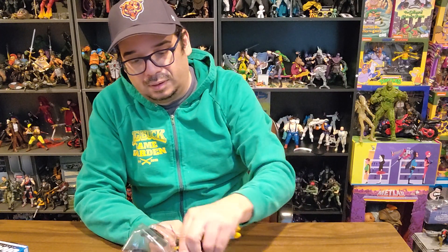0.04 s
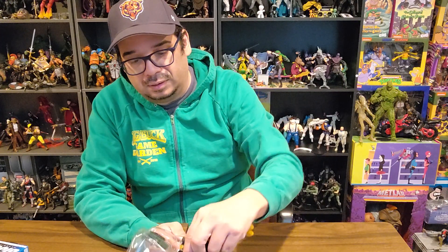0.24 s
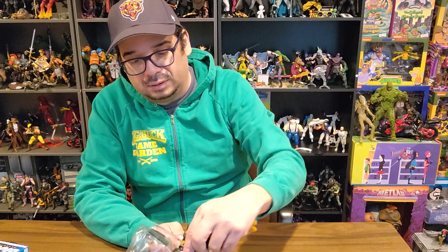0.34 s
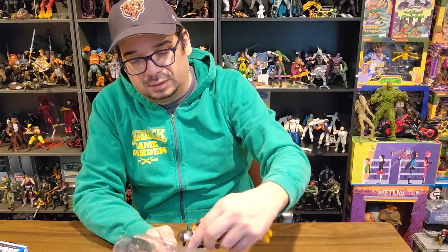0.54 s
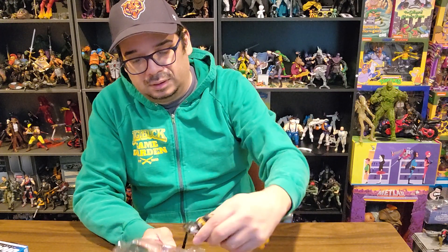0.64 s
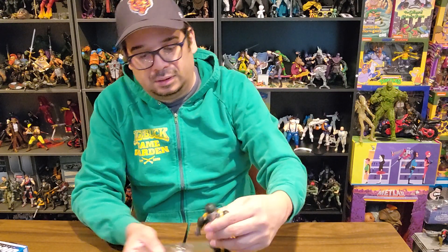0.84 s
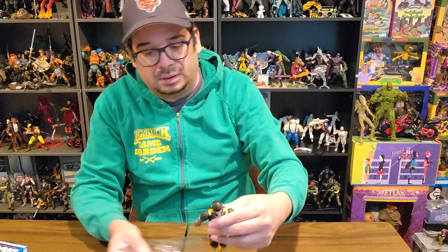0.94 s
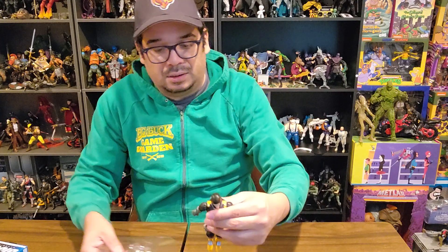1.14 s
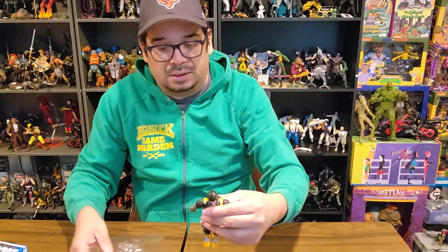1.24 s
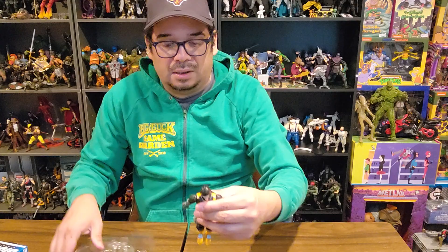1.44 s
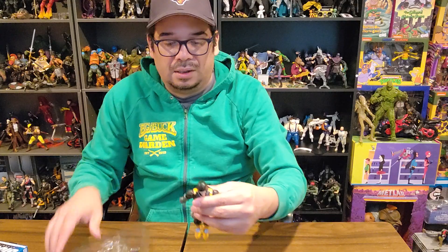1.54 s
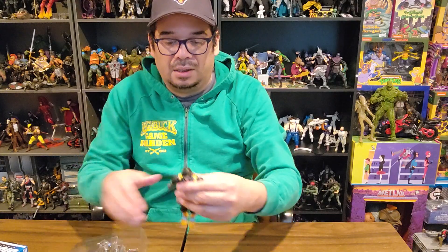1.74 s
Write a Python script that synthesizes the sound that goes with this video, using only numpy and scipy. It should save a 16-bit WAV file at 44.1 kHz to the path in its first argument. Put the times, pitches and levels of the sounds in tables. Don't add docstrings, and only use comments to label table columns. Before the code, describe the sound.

Thin hard plastic packaging crinkles, strains and pops sharply until a toy comes loose; faint settling ticks follow, then the empty tray is pushed aside, rattling on wood, heard at arm's length in a small, fairly dry room.

```python
import sys
import numpy as np
from scipy import signal
from scipy.fft import rfft, irfft
from scipy.io import wavfile
from scipy.ndimage import uniform_filter1d

SR = 44100
rng = np.random.default_rng(int(sys.argv[2]) if len(sys.argv) > 2 else 0)


def level_to_linear(level):
    exponent = np.asarray(level, float) / 20
    return 10 ** exponent


def pcm_store(signal):
    levels = np.round(np.clip(np.atleast_2d(signal), -1, 1) * 32767)
    wavfile.write(sys.argv[1], SR, levels.astype(np.int16).T)


N = 79380

# freq_hz, level_db
AIR_COLOUR = [(15, -29.5), (25, -10), (134, -10.5), (256, -39), (2160, -22), (6000, -27.5), (7000, -31.5),
              (16000, -42.5)]
# freq_hz, fade_s
ROOM_FADE = [(150, .26), (2000, .14), (12000, .11)]
# start_s, peak_db
THUMPS = [
    (0.377, -50),
    (0.533, -58),
    (0.547, -38.5),
    (0.729, -59.5),
    (1.228, -54.5),
    (1.48, -41),
    (1.52, -44.5),
    (1.606, -54),
]
TABLE_HZ = (68, 109, 208.5)

# time_s, level_db
GRIP = [
    (0, -63),
    (.13, -54),
    (.145, -47),
    (.2, -45.5),
    (.28, -47),
    (.335, -47.5),
    (.37, -110),
]
# time_s, level_db
STRAIN = [
    (.33, -55.5),
    (.385, -31.5),
    (.47, -45.5),
    (.52, -34),
    (.61, -64.5),
    (.76, -64),
]
# time_s, level_db
CRACKLE = [(0, -69), (.12, -80), (.19, -54.5), (.22, -55), (.31, -54), (.335, -80.5), (.37, -43),
           (.43, -49), (.52, -46), (.6, -63), (.65, -79), (.8, -120)]
# time_s, level_db
DRAG = [
    (1.16, -71.5),
    (1.25, -45),
    (1.42, -52),
    (1.55, -47.5),
    (1.575, -77),
    (1.60, -49.5),
    (1.72, -55.5),
    (1.75, -68.5),
    (1.8, -77),
]
# time_s, level_db
EASE = [
    (0.839, -80),
    (.90, -91),
    (1.0, -85.5),
    (1.04, -96),
]

# freq_hz, level_db
CREAK_COLOUR = [(100, -14), (400, -5), (1330, -3), (3300, -13.5), (16000, -55.5)]
FILM_COLOUR = [(1000, -33), (2800, -14), (5500, 2.5), (6500, -4), (12000, -16.5), (16000, -19)]
SCRAPE_COLOUR = [(100, -22.5), (620, -12.5), (1500, -17), (3300, -22.5), (3900, -24.5), (5600, -19),
                 (6600, -56.5), (16000, -47.5)]

# pitch_hz, width_hz, level_db
TRAY_HELD = [(388, 12, -4.5), (600.5, 40, 3.5), (995, 11, -1.5), (1332, 57, -12), (1566, 240, 0.5),
             (2093, 83, -5)]
TRAY_GRIPPED = [(405, 54, 2.5), (520, 38, 0), (1030, 59, 1.5), (1290, 20, -7.5), (1450, 30, 4.5),
                (2000, 150, -8.5)]
TRAY_FLAT = [(626.4, 15, 5.5), (722.4, 27, 2), (873, 36, -5), (1370, 160, -8), (1496, 52, -4.5),
             (1800, 50, 2), (1780, 380, -2), (2510, 40, -2.5)]
TRAY_SLIDING = [(624, 45, -0.5), (710, 40, -0.5), (1270, 60, -3), (1460, 40, 3.5), (1873, 100, -6),
                (2430, 24, -9), (5840, 300, -20)]
# pitch_hz, width_hz, level_db
FILM_RINGS = [(3406, 250, 0), (4100, 200, -2), (5360, 400, 0)]
EASE_RINGS = [(2190, 140, -0.5), (3270, 120, -9.5), (3990, 77, -7)]

# start_s, peak_db, body_db, crisp_db, edge_db
PULL = [(0.012, -37.5, -11.5, -8, -45), (0.016, -42.5, -25, -39, -43), (0.0455, -66, -19, 6.5, 4),
        (0.0583, -55, 5, 5.5, -5.5), (0.076, -44.5, 2, -5, -9), (0.0995, -60, -2, 16, -21),
        (0.137, -36.5, -11, -11, -14.5), (0.1554, -38, 0, -2.5, -23), (0.166, -56.5, -18, 2, -1),
        (0.1913, -32.5, -10, -1, -2.5), (0.2276, -11, -30, -4, -11), (0.289, -27, -23, -12, -49),
        (0.3672, -16, -11.5, -9, -24), (0.3835, -26, -3.5, -12, -5.5), (0.4029, -32.5, -5, -3, -4),
        (0.4386, -28, -33.5, 3.5, 8.5), (0.4843, -6, -14.5, -7.5, -11)]
FREE = [
    (0.5253, -6, -14.5, -11.5, 1),
    (0.5292, -12, -11.5, -2, -3.5),
    (0.5311, -7, -16.5, 1, -8.5),
    (0.537, -9.5, -22, 0, -18.5),
    (0.544, -16.5, -4.5, -1.5, -19),
]
SMALL = [
    (.301, -31.5, -7, -20, -40),
    (.372, -26, -0.5, -4.5, -24),
    (.451, -20.5, -21, -11, -16),
    (.504, -25, 1.5, -12, -16.5),
    (.695, -57.5, -1.5, 5, -15.5),
    (1.388, -33.5, -27, -30, -42),
    (1.695, -36.5, -5, -15, -29),
]
SETTLE = [
    (0.6827, -54.5, 4, -0.5, -16),
    (0.7025, -37, -3.5, -8.5, -33),
    (0.7292, -31, -5, -4.5, -24.5),
    (0.7889, -29, -21.5, -21.5, -31),
    (0.8258, -60.5, -18, 7.5, -7),
    (0.851, -45.5, -7.5, 2, -27),
    (0.9586, -45, -21, -4.5, -4.5),
    (1.043, -35.5, -14.5, -7.5, -31),
    (1.066, -32.5, -12, -12, -22.5),
]
PUSH = [
    (1.1662, -51, 8.5, -2, -6),
    (1.191, -21, -9.5, -12, -17.5),
    (1.1986, -22.5, -7, -22, -28),
    (1.2445, -34.5, -1, -6.5, -17),
    (1.275, -29, -5, 3.5, 2),
    (1.428, -17, -8, -20, -35),
    (1.5922, -35.5, 0, -27, -23),
    (1.6072, -30.5, 3.5, -14, -19.5),
    (1.6527, -32, 2.5, -18, -28.5),
]
LAND = [
    (1.478, -32, 2.5, -11, -16),
    (1.488, -17, -2, -37, -25.5),
    (1.499, -32.5, -1, -29, -11),
    (1.512, -40.5, 8.5, -9, -25),
    (1.540, -30, -11.5, -19, -33),
]
# panel_hz, fold_hz
PULL_HZ = [(1430, 4900), (1390, 5300), (1530, 4820), (1190, 4600), (1200, 5200), (1630, 4700), (1474, 7800),
           (1630, 5300), (1460, 4410), (1960, 4100), (1610, 2700), (2230, 3160), (2560, 20000),
           (1440, 21000), (1330, 7000), (1910, 7010), (2428, 4010), (2146, 3900), (1730, 6500),
           (1605, 2100), (2326, 8200), (1620, 12000)]
SMALL_HZ = [(2110, 4000), (1620, 9900), (1440, 9900), (1236, 5000), (2350, 4900), (2640, 2800),
            (1444, 3100)]
SETTLE_HZ = [(1760, 3400), (2320, 2600), (1503, 8500), (1880, 3000), (1400, 5200), (1510, 4930),
             (2260, 6200), (2100, 2900), (1885, 3330)]
PUSH_HZ = [(1240, 5160), (1266, 5520), (1883, 2540), (1940, 3850), (1490, 7320), (1888, 2700), (1480, 3700),
           (1984, 2900), (1557, 3200)]
LAND_HZ = [(1300, 2770), (1729, 4840), (1440, 4200), (1505, 5100), (1530, 3600)]

# level_db, then fade_s by 60 dB, then side share
RATTLE_DB = (-16, -17, -20, -21)
RATTLE_FADE_S = (.2, .13, .12, .11)
RATTLE_SIDE = (0.15, 0.36, 0.5, 0.75)
LEFT_LOUDER_DB = (1.06, 1)


def curve(rows, at, log=False):
    r = np.array(rows, float)
    if log:
        return np.interp(np.log(at), np.log(r[:, 0]), r[:, 1])
    return np.interp(at, r[:, 0], r[:, 1], left=-120)


def unit(x):
    return x / np.sqrt(np.mean(x ** 2) + 1e-20)


def peak_one(x):
    return x / np.max(np.abs(x))


def colour(x, spectrum):
    f = np.maximum(np.arange(x.shape[-1] // 2 + 1) * SR / x.shape[-1], 10)
    return irfft(rfft(x) * level_to_linear(curve(spectrum, f, True)), x.shape[-1])


def band(x, lo_hz, hi_hz):
    sos = signal.butter(2, [lo_hz, min(hi_hz, .45 * SR)], "band", fs=SR, output="sos")
    return signal.sosfilt(sos, x)


def ring(x, peaks):
    return sum(level_to_linear(db) * signal.lfilter(*signal.iirpeak(hz, hz / w, SR), x) for hz, w, db in peaks)


def walk(rate):
    k = int(SR / rate)
    steps = np.repeat(rng.standard_normal(N // k + 1), k)
    return unit(uniform_filter1d(steps, k)[:N])


def air():
    n = rng.standard_normal((3, N))
    return level_to_linear(-68 - 6.0) * unit(colour(n[0] + 0.58 * n[1:], AIR_COLOUR))


def room(x):
    t = np.arange(SR // 2) / SR
    echo = 0
    for hz in 125 * 2 ** np.arange(8):
        n = rng.standard_normal((3, len(t)))
        alike = np.clip(0.87 + 150 / hz, 0, 1)
        n = band(np.sqrt(alike) * n[0] + np.sqrt(1 - alike) * n[1:], hz / np.sqrt(2), hz * np.sqrt(2))
        echo = echo + n * level_to_linear(-60 * t / curve(ROOM_FADE, hz, True))
    echo = echo * (t > 0.0091)
    return signal.fftconvolve(x[None], echo / np.sqrt(np.sum(echo ** 2) / 2), axes=1)[:, :N]


def thumps():
    out, t = np.zeros(2 * N), np.arange(12000) / SR
    fade_s = 0.11
    for s, db in THUMPS:
        g = rng.standard_normal(3)
        boom = sum(level_to_linear(a) * np.sin(2 * np.pi * hz * (1 + 0.066 * a) * t) for hz, a in zip(TABLE_HZ, g))
        swell = (1 - np.exp(-t / 0.0013)) ** 2
        i = int(s * SR)
        out[i:i + t.size] += level_to_linear(db + 11.5 - 60 * t / fade_s) * swell * peak_one(boom)
    return out[:N]


def rub(control, tray, spectrum, rate, spread_db, ring_share, flicker_db):
    u = rng.random((3, 2, N))
    happens, sign = u[0] < rate / SR, np.sign(u[1] - .5)
    clicks = unit(happens * sign * level_to_linear(-spread_db * np.log(u[2] + 1 / 40)))
    x = clicks * level_to_linear(curve(control, np.arange(N) / SR) + flicker_db * walk(70))
    bends = [level_to_linear(3.0 * walk(16)) for _ in tray]

    def rubbed(v):
        return colour(v, spectrum)

    def rings(v):
        return band(sum(b * ring(v, [m]) for b, m in zip(bends, tray)), 440, 7800)

    def levelled(f):
        return f(x) / np.std(f(clicks[0]))

    return (levelled(rubbed) + ring_share * levelled(rings)) * np.array([[1], [.35]])


def panel_ring(t, hz, g):
    pitch = hz * np.array([1, .84, 1.27]) * (1 + 0.015 * g[0] * np.sign(np.arange(3)))
    notes = level_to_linear(-5 * np.arange(3) + 2 * g[1]) @ np.sin(2 * np.pi * pitch[:, None] * t)
    return notes * (1 - np.exp(-t / 0.00083)) * level_to_linear(-60 * t / 0.048)


def snaps(rows, shape, rise_s, pitches):
    out, t = np.zeros((2, 2 * N)), np.arange(6000) / SR
    edges = [(300, 1200), (1200, 3000), (3000, 6500), (6500, 15500)]  # body, crack, crisp, edge (Hz)
    filters = [signal.butter(3, e, "band", fs=SR, output="sos") for e in edges]

    def only(v, k):
        return signal.sosfilt(filters[k], v)

    for (s, db, body_db, crisp_db, edge_db), (panel_hz, fold_hz) in zip(rows, pitches):
        n, g = rng.standard_normal((6, t.size)), rng.standard_normal((2, 3))
        shifts = rng.standard_normal((len(shape), 2))
        tray = [(f * (1 + .03 * a), w, d + 4 * b) for (f, w, d), (a, b) in zip(shape, shifts)]
        folds = [(fold_hz, 200, 14)]
        folds += [(f, 900, 0) for f in 3200 * 2 ** (2.1 * rng.random(4))]

        def hit(k, decay_s):
            return n[k] * np.exp(-t / decay_s) * (1 - np.exp(-t / rise_s))

        low, mid, crisp, edge = hit(0, 0.0034), hit(1, 0.0016), hit(2, 0.0015), hit(3, 0.0012)
        body = peak_one(peak_one(only(low, 0)) + 1.6 * peak_one(only(ring(low, tray), 0)))
        crack = level_to_linear(-10.5) * peak_one(only(mid, 1))
        crack = crack + level_to_linear(-7) * peak_one(panel_ring(t, panel_hz, g))
        crack = crack + level_to_linear(-4.5) * peak_one(only(ring(mid, tray), 1))
        crisp = peak_one(only(crisp + 0.4 * ring(crisp, folds), 2))
        edge = peak_one(only(edge + 8.4 * ring(edge, folds), 3))

        rattle = n[4:] * level_to_linear(0.57 * unit(uniform_filter1d(rng.standard_normal(t.size), 90)))
        rattle = .5 * rattle + 0.5 * ring(rattle, tray) + ring(rattle, folds)

        i = int(s * SR)
        levels = (body_db + 3, 0, crisp_db + 4.5, edge_db + 5.5)
        for k, (part, rel_db) in enumerate(zip((body, crack, crisp, edge), levels)):
            fade = level_to_linear(RATTLE_DB[k] - 60 * t / RATTLE_FADE_S[k]) * (1 - np.exp(-t / 0.003))
            tail = fade * unit(only(rattle, k))
            late = 1.3 * np.sign(g[1, 2]) * np.roll(part, 23)
            both = np.array([part + tail[0], RATTLE_SIDE[k] * (tail[1] + late)])
            out[:, i:i + t.size] += level_to_linear(db + rel_db) * both
    return out[:, :N]


def ports(ms, left_louder_db, lag_s):
    f = np.arange(N // 2 + 1) * SR / N
    left = irfft(rfft(ms[0] + ms[1]) * np.exp(-2j * np.pi * f * lag_s), N)
    right = ms[0] - ms[1]
    return np.array([left * level_to_linear(left_louder_db / 2), right * level_to_linear(-left_louder_db / 2)])


def scene():
    held = snaps(PULL + FREE, TRAY_HELD, 0.00011, PULL_HZ)
    held += snaps(SMALL, TRAY_HELD, 0.0004, SMALL_HZ)
    aside = snaps(SETTLE, TRAY_HELD, 0.000056, SETTLE_HZ)
    aside += snaps(PUSH, TRAY_FLAT, 0.001, PUSH_HZ)
    aside += snaps(LAND, TRAY_FLAT, 0.0023, LAND_HZ)
    held += rub(GRIP, TRAY_GRIPPED, CREAK_COLOUR, rate=1700, spread_db=4.0, ring_share=0.95, flicker_db=5.0)
    held += rub(STRAIN + EASE[:1], TRAY_HELD, CREAK_COLOUR,
                rate=1700, spread_db=1.5, ring_share=0.95, flicker_db=3.5)
    held += rub(CRACKLE, FILM_RINGS, FILM_COLOUR, rate=2200, spread_db=4.5, ring_share=.7, flicker_db=2.5)
    aside[0] += thumps()
    aside += rub(DRAG, TRAY_SLIDING, SCRAPE_COLOUR, rate=4000, spread_db=2.0, ring_share=1.71, flicker_db=2.5)
    aside += rub(EASE, EASE_RINGS, AIR_COLOUR, rate=1300, spread_db=-4.5, ring_share=11.0, flicker_db=0.5)
    direct = ports(held, LEFT_LOUDER_DB[0], 0) + ports(aside, LEFT_LOUDER_DB[1], 0.00007)
    return direct + level_to_linear(-14) * room(held[0] + aside[0]) + air()


def band_limit(x):
    return signal.sosfilt(signal.butter(12, 16640, fs=SR, output="sos"), x)


def record(dry):
    cut = signal.sosfilt(signal.butter(2, 45, "high", fs=SR, output="sos"), dry)
    rounded = .9 * np.tanh(cut / .9)
    mix = signal.sosfilt(signal.ellip(8, .2, 70, 16000, fs=SR, output="sos"), rounded)
    return band_limit(mix)


dry = scene()
out = record(dry)
pcm_store(out)
```